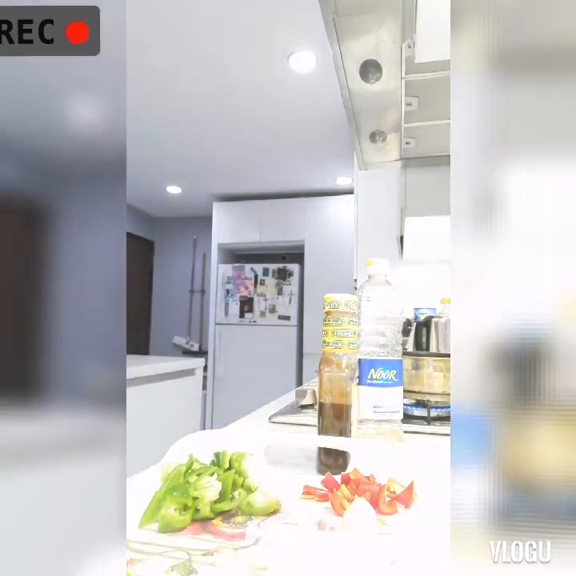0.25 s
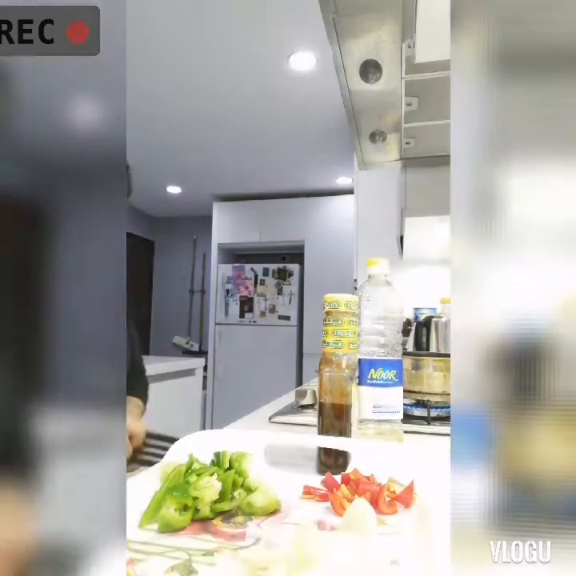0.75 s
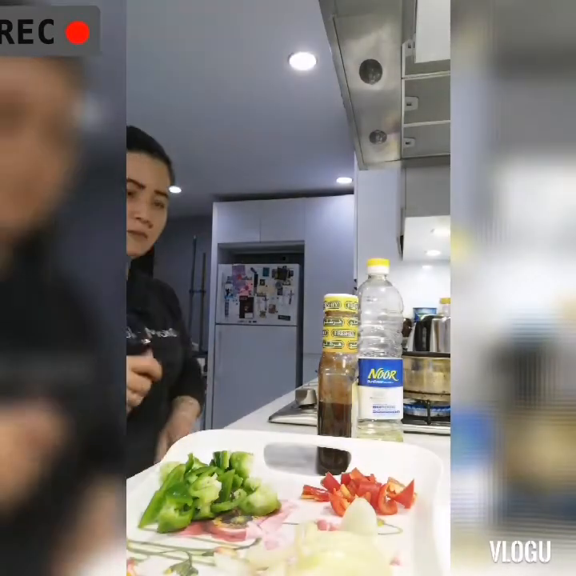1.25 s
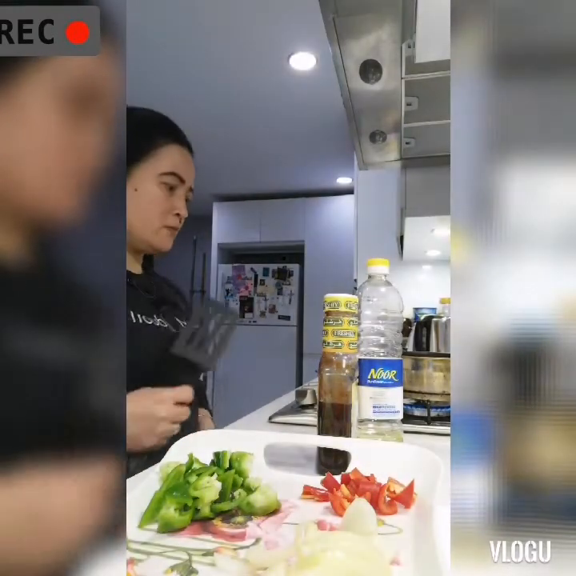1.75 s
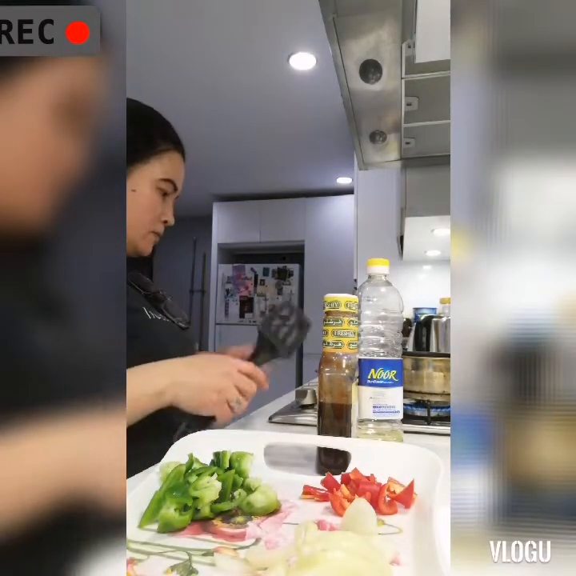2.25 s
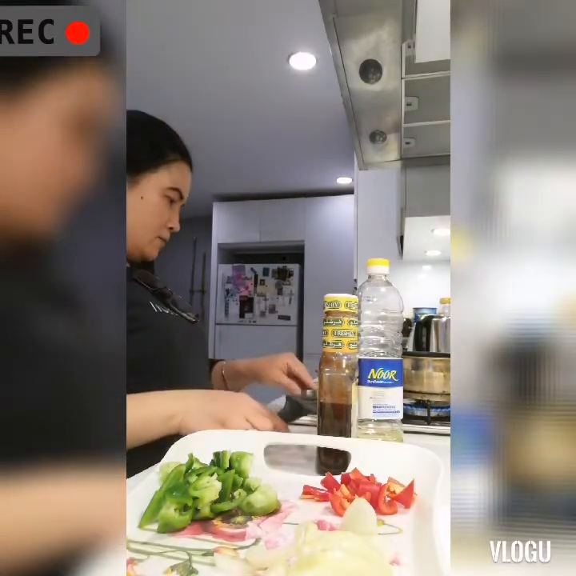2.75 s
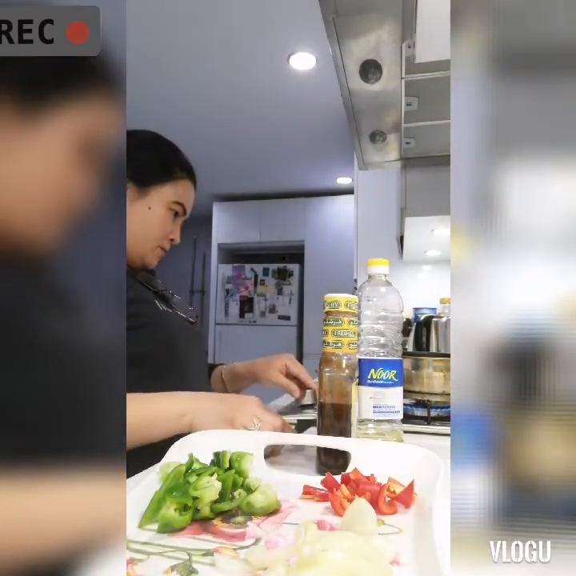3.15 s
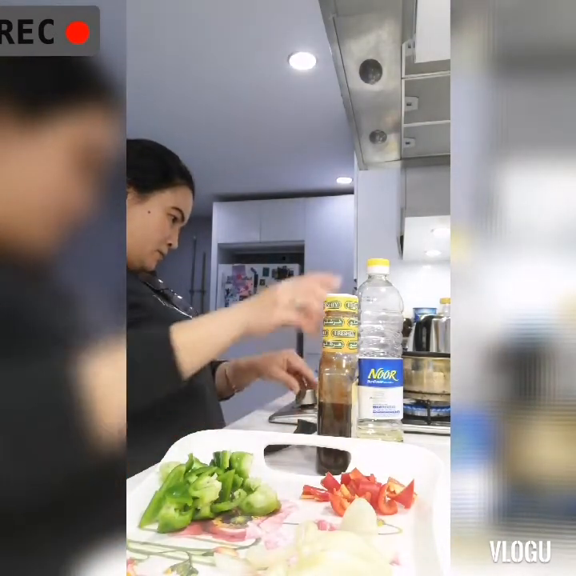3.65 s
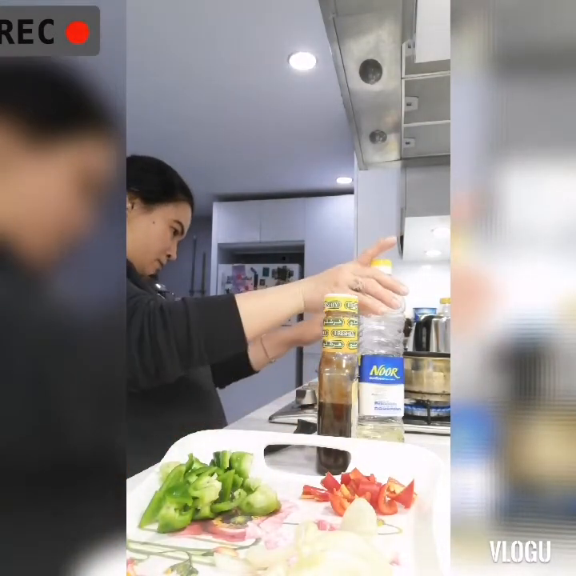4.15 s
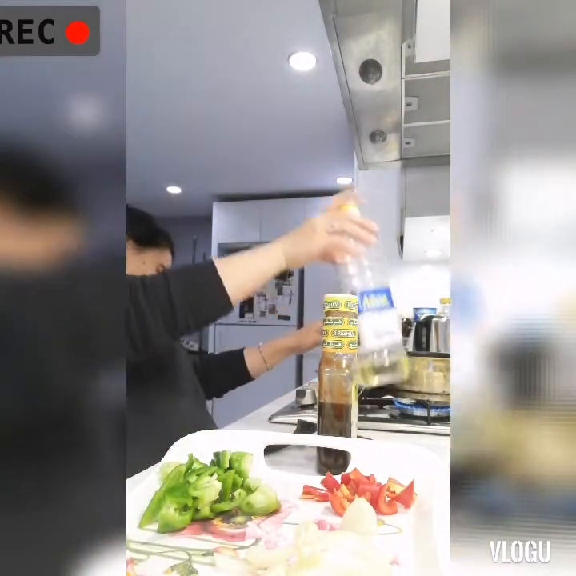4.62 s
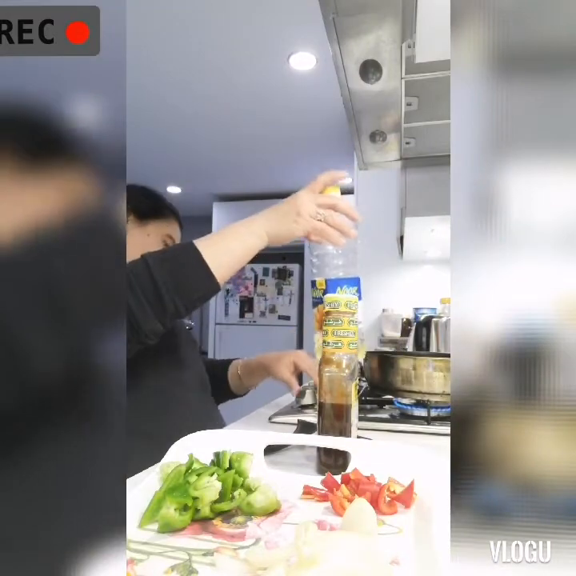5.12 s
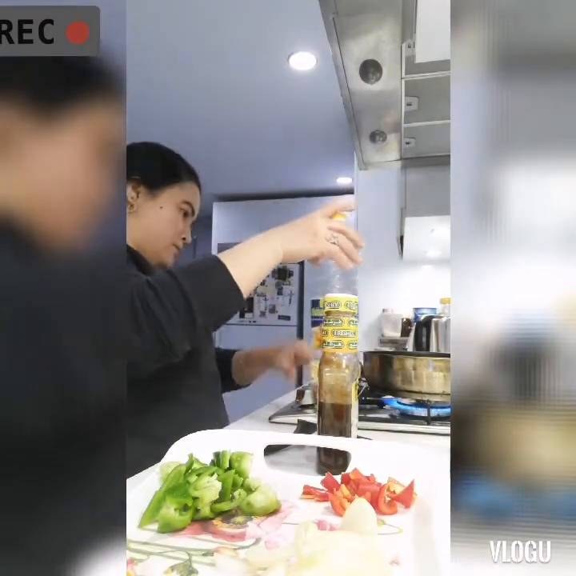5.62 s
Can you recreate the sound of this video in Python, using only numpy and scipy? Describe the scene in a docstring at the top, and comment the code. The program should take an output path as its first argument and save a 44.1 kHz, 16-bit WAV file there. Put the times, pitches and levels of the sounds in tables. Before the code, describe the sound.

A quiet, hard-walled kitchen with low appliance hum and faint hiss. Soft rustling and dragging lead to a loud drawer slam with jangling cutlery, then dull thumps and cloth brushing. A spatula taps, a steel spoon bounces down, and a stove knob snaps sharply. A plastic bottle creaks and clicks before burner gas whistles at the end. Close mono microphone, lively short echoes.

```python
"""A cutlery drawer slides, clatters and bumps shut in a hard-walled kitchen: noise through cabinet resonances,
with bursts and ringing modes for the blows. At the stove a spatula and a steel spoon are put down and a knob
snaps; a plastic bottle creaks in the hand. Gas starts to whistle in the burner, noise through its cavities.
A low appliance hum and a faint hiss lie under it all; filtered noise echoes give the blows their room."""
import sys
import numpy as np
from scipy import signal
from scipy.fft import rfft, irfft
from scipy.io import wavfile
from scipy.ndimage import uniform_filter1d

SR = 44100
rng = np.random.default_rng(int(sys.argv[2]) if len(sys.argv) > 2 else 0)


def store_pcm(level_fs):
    """Save levels as 16-bit WAV."""
    pcm = np.round(np.clip(level_fs, -1, 1) * 32767).astype(np.int16)
    wavfile.write(sys.argv[1], SR, np.atleast_2d(pcm).T)


N = 259308   # length in samples

# Airy crack of steel on steel. Each row: pitch in Hz, level in dB, t60 in seconds.
STEEL_CRACK = [(6500, -20, 0.05), (13500, -16, 0.12)]
BURST_RISE_S = 0.0014   # onset of the hard knocks and of the knob


def from_db(db):
    """Decibels to gain."""
    return 10 ** (np.asarray(db) / 20)


def rms_one(x):
    """Scale to rms 1."""
    return x / np.sqrt(np.mean(x ** 2) + 1e-20)


def at_hz(points, hz):
    """Read a curve of (Hz, value) points on a log-frequency axis."""
    points = np.array(points)
    return np.interp(np.log(hz + 1), np.log(points[:, 0]), points[:, 1])


def coloured(spectrum):
    """Noise with the given spectrum, rms 1."""
    hz = np.fft.rfftfreq(N, 1 / SR)
    white = rfft(rng.standard_normal(N))
    return rms_one(irfft(white * from_db(at_hz(spectrum, hz)), N))


def flicker(rate, depth_db):
    """A gain that wanders about rate times a second."""
    knots = rng.standard_normal(1000)
    return from_db(depth_db * np.interp(np.arange(N) * rate / SR, np.arange(1000), knots))


def resonance(x, hz, width_hz):
    """Two-pole resonance, gain 1 on top."""
    r = np.exp(-np.pi * width_hz / SR)
    feedback = [1, -2 * r * np.cos(2 * np.pi * hz / SR), r * r]
    return signal.lfilter([(1 - r * r) / 2, 0, (r * r - 1) / 2], feedback, x)


def resonant_noise(peaks):
    """Noise twice through each resonance, the second three times as wide, each at its own rms level."""
    out = np.zeros(N)
    for hz, width_hz, db in peaks:
        narrow = resonance(rng.standard_normal(N), hz, width_hz)
        out += from_db(db) * rms_one(resonance(narrow, hz, 3 * width_hz))
    return out


def fade(t60, rise_s, size=8192):
    """Quick rise and exponential fall."""
    t = np.arange(size) / SR
    return from_db(-60 * t / t60) * (1 - np.exp(-t / rise_s))


def swell(start_s, rise_s):
    """Smooth step from 0 to 1."""
    x = np.clip((np.arange(N) / SR - start_s) / rise_s, 0, 1)
    return x * x * (3 - 2 * x)


def strokes(rows, release_s, upper_fades):
    """Two gains from strokes that rise, change steadily in dB and let go."""
    t, out = np.arange(N) / SR, np.zeros((2, N))
    for s, length, first_db, second_db, fade_db_per_s, attack_s in rows:
        shape = swell(s - attack_s / 2, attack_s) * (1 - swell(s + length, release_s))
        lost_db = fade_db_per_s * np.clip(t - s, 0, length + release_s)
        out += shape * from_db([first_db - lost_db, second_db - upper_fades * lost_db])
    return out


def add(out, s, x):
    """Mix a short sound in at time s."""
    i = round(s * SR)
    out[i:i + len(x)] += x[:N - i]


def shaped(noise, envelope):
    """Noise under an envelope, carrying just the envelope's energy."""
    return rms_one(noise * envelope) * np.sqrt(np.mean(envelope ** 2))


def even_burst(envelope):
    """Micro-impacts under an envelope, spread so that no pitch stands out."""
    x = rng.standard_normal(len(envelope)) * envelope
    for _ in range(3):
        # level the spectrum, then restore the envelope in time
        spectrum = rfft(x)
        x = irfft(spectrum / (np.abs(spectrum) + 1e-12), len(x))
        x = envelope * x / np.sqrt(uniform_filter1d(x ** 2, size=160) + 1e-20)
    return x


def struck(blows, modes, share_db, loose_hz, rise_s=0.00058):
    """Every blow rings every mode; loose contact makes each ring waver within loose_hz."""
    out = np.zeros(N)
    for s, db in blows:
        for hz, level_db, t60 in modes:
            noise = rng.standard_normal(36864)
            ring = resonance(resonance(noise, hz, loose_hz), hz, 2 * loose_hz)[4096:]   # skip the build-up
            ring = shaped(ring, fade(t60, rise_s, size=32768))
            add(out, s, from_db(db + level_db + share_db) * ring)
    return out


def background():
    """Faint broadband hiss, and an appliance drone as narrow resonant noise."""
    # Hiss of the still kitchen. Each row: frequency in Hz, relative level in dB.
    floor = [(12, -39), (20, 0), (86, -8), (116, -9), (138, -20.5), (228, -14), (319, -29), (347, -22),
             (607, -29), (949, -29), (2200, -37), (2390, -31.5), (10800, -46), (14700, -44), (16000, -48)]
    # Appliance drone. Each row: pitch in Hz, width of its narrower resonance in Hz, rms level in dB.
    hum = [(119.4, 4.46, -69.5)]
    return from_db(-61) * coloured(floor) + resonant_noise(hum)


def gas():
    """The tap opens: the jet excites the burner's cavities and roars below."""
    # Burner cavities. Each row: pitch in Hz, width of the narrower resonance in Hz, relative level in dB.
    burner = [(1000, 200, -9), (1370, 100, 0), (1550, 150, -7), (2390, 300, -22), (4520, 150, -23),
              (6450, 170, -27), (8760, 150, -30), (9970, 120, -29), (11300, 90, -22)]
    # Plain jet noise. Each row: frequency in Hz, relative level in dB.
    jet_colour = [(300, -10), (900, 13), (1700, 2), (2500, -34.5), (6000, -58.5), (11000, -2), (15000, -23)]
    gas_on_s = 5.605
    whistle = from_db(-54.5) * swell(gas_on_s, rise_s=0.14)
    roar = from_db(-51.5) * swell(gas_on_s, rise_s=0.23)
    jet = rms_one(resonant_noise(burner)) + from_db(-11.5) * coloured(jet_colour)
    low = rms_one(resonant_noise([(133, 45, 0.81), (215.0, 23.5, -1.7)]))
    return whistle * jet + roar * flicker(30, 3.8) * low


def rustle():
    """Cloth and hands brushing: fine friction noise in two colours."""
    # Each row: start in seconds, length in seconds, bright hiss in dB, duller swish in dB,
    # fade of the hiss in dB per second, attack in seconds.
    brushes = [(0.0, 0.47, -53.5, -55.5, 170, 0.026), (.62, 0.08, -65, -53.5, 36, 0.033),
               (1.26, 0.32, -67, -64.5, 50, .04), (1.55, 0.079, -62, -64, 24, 0.065),
               (1.645, 0.33, -57.5, -54, 24, 0.015), (1.79, 0.13, -52.5, -65, 68, 0.27),
               (2.3, 0.16, -70, -70, 6, 0.17), (2.5, 0.18, -66, -64, 68.5, 0.057),
               (4.21, 0.043, -71, -94, 11, 0.012), (4.3, 0.1, -63, -83, 123, 0.036),
               (4.43, 0.15, -81, -92, -4, 0.032)]
    # Bright hiss. Each row: frequency in Hz, relative level in dB.
    hiss_colour = [(4000, -14.5), (6000, -13), (8000, -14.5), (9500, -16.5), (11000, -19), (14000, -30.5),
                   (16000, -20.5)]
    # Duller swish. Each row: frequency in Hz, relative level in dB.
    swish_colour = [(500, -25.5), (1200, -7.5), (2400, 18), (4800, 3), (7000, -18.5), (10000, -20)]
    gains = strokes(brushes, release_s=0.081, upper_fades=0.49)
    hiss, swish = gains * flicker(66, 0.81) * flicker(14, 3.0)
    return hiss * coloured(hiss_colour) + swish * coloured(swish_colour)


def ticks():
    """Tiny noise bursts: a pitch of their own, the bottle's plastic wall, a thin click."""
    # Small bright ticks and creaks. Each row: start in seconds, level in dB before a trim, pitch in Hz.
    creaks = [(2.709, -60, 9560), (4.068, -62, 6860), (4.267, -57, 4760), (4.301, -55, 5030),
              (4.3112, -47.5, 9100), (4.335, -56, 5600), (4.434, -56, 4850), (4.4606, -54, 6660),
              (4.46, -52.5, 4970), (4.4603, -48, 2770), (4.4789, -57, 6960), (5.022, -57, 6200),
              (3.249, -63, 4480)]
    # The bottle cap clicks. Each row: start in seconds, level in dB.
    cap_clicks = [(5.042, -34), (5.0495, -50)]
    # Modes of the cap. Each row: pitch in Hz, level in dB, t60 in seconds.
    cap = [(1160, -19, 0.022), (2540, -11.5, 0.027), (4400, -9, 0.019), (5000, -2, 0.018),
           (6100, -2, 0.013), (8840, -15, 0.0099)]
    out = np.zeros(N)
    for s, db, hz in creaks:
        noise = rng.standard_normal(8192)
        own = resonance(noise, hz, 0.045 * hz)
        wall = 0.14 * resonance(noise, 3100, 345)
        click = 0.051 * resonance(noise, 6600, 6000)
        tick = shaped(own + wall + click, fade(t60=0.055, rise_s=0.00075))
        add(out, s, from_db(db - 5.5) * tick)
    return out + struck(cap_clicks, cap, share_db=-0.5, loose_hz=320, rise_s=0.0017)


def bumps():
    """A soft blow sets a panel mode and a weaker, slightly off upper one swinging."""
    # Dull bumps through the counter. Each row: start in seconds, level in dB, pitch in Hz, t60 in seconds.
    thuds = [(.569, -37, 577, 0.12), (0.57, -45.5, 1117, 0.096), (0.787, -27.5, 197, 0.067),
             (1.247, -22, 117, 0.063), (1.397, -34.5, 172, 0.35), (1.57, -14.5, 115.5, 0.083),
             (1.597, -19.5, 103, 0.095), (1.875, -30, 84, 0.15), (1.908, -33.5, 206, 0.25),
             (2.002, -22, 204.6, 0.11), (2.087, -29.5, 67, 0.16), (2.232, -26, 179, 0.022),
             (3.245, -32.5, 417, 0.047), (3.399, -53.5, 385, 0.16), (3.551, -29, 171, 0.17),
             (4.116, -41, 102, 0.25), (4.128, -49, 311, 0.074), (4.217, -43, 1253, 0.016),
             (4.236, -40, 196, 0.11), (4.24, -38.5, 386, 0.092), (4.462, -43.5, 223, 0.12),
             (4.653, -42.5, 380, 0.1)]
    out, t = np.zeros(N), np.arange(8192) / SR
    for s, db, hz, t60 in thuds:
        swing = np.sin(2 * np.pi * hz * t) + 0.25 * np.sin(2 * np.pi * 1.3 * hz * t)
        add(out, s, from_db(db) * swing * fade(t60, rise_s=0.0034))
    return out


def knob():
    """Each snap is a very short burst through the broad resonances of knob and stove front."""
    # The knob snaps past its catch. Each row: start in seconds, peak in dB.
    snaps = [(3.548, -10.5), (3.567, -19)]
    # Knob and stove front. Each row: pitch in Hz, width in Hz, relative level in dB.
    front = [(1365, 280, -3), (2120, 260, -0.5), (2470, 292, 2), (3300, 410, -8), (5000, 600, -11),
             (8610, 600, -11.5)]
    out = np.zeros(N)
    for s, db in snaps:
        impacts = even_burst(fade(0.035, BURST_RISE_S))
        ring = np.zeros(len(impacts))
        for k, (hz, width_hz, level_db) in enumerate(front):
            ring += (-1) ** k * from_db(level_db) * resonance(impacts, hz, width_hz)   # alternating sign
        add(out, s, from_db(db) * ring / np.abs(ring).max())
    return out


def spatula():
    """The spatula rings against the drawer edge, then its head lands on the hob and the hob rings."""
    # Blows on the drawer edge. Each row: start in seconds, level in dB.
    edge_blows = [(2.0015, -38.5)]
    # Modes of the spatula. Each row: pitch in Hz, level in dB, t60 in seconds.
    blade = [(2010, -1, 0.5), (2250, 11, .04), (4330, -13, 0.65), (7180, -14, 0.45)]
    # The head lands on the hob. Each row: start in seconds, level in dB.
    set_down = [(3.248, -37)]
    # Modes of the hob. Each row: pitch in Hz, level in dB, t60 in seconds.
    hob = [(455, -4.5, 0.59), (659, -5, 0.059), (1115, -14.5, 0.2), (1980, -4, 0.032)]
    ring = struck(edge_blows, blade, share_db=-2.5, loose_hz=680)
    return ring + struck(set_down, hob, share_db=0.0, loose_hz=129.7)


def spoon():
    """A steel spoon bounces: each landing rings its modes under an airy crack."""
    # Landings. Each row: start in seconds, level in dB.
    bounces = [(3.398, -24.5), (3.4455, -30.5), (3.474, -33), (3.492, -36)]
    # Modes of the spoon. Each row: pitch in Hz, level in dB, t60 in seconds.
    modes = [(2410, 1, 0.043), (4000, -16, 0.042), (4740, -11, 0.098), (8720, -9, 0.03), (9690, -16, 0.05)]
    ring = struck(bounces, modes, share_db=-1.5, loose_hz=169.7)
    return ring + struck(bounces, STEEL_CRACK, share_db=-4.5, loose_hz=6000)


def knocks():
    """A burst of micro-impacts heard through the body, a bright crack and a boomy panel."""
    # Hard knocks. Each row: start in seconds, level in dB before a trim, body pitch in Hz,
    # treble in dB relative to the body, bass in dB relative to the body, burst t60 in seconds.
    hits = [(0.621, -43, 1990, -16, 12.5, 0.066), (0.713, -11, 990, -8.5, -4, 0.099),
            (.771, -5, 2500, -9, -11, 0.11), (0.809, -8.5, 2520, -21, -11.5, 0.067),
            (1.545, -42, 2490, -5, 13.5, 0.06), (1.562, -30, 1140, -25, -1.5, 0.42),
            (1.641, -26.5, 3300, 2, -24, 0.023), (2.002, -35, 1340, -11.5, -1.5, 0.54),
            (2.489, -49.5, 1120, -15, 2.5, 0.34), (3.398, -23, 3230, 2, 5, 0.078),
            (3.548, -12, 1500, -6, -0.5, 0.074), (3.59, -19.5, 1240, -23, 1, 0.038),
            (4.651, -46, 2006, -17, -8.5, 0.033)]
    out = np.zeros(N)
    bright = signal.butter(3, [4000, 10500], "band", fs=SR, output="sos")
    dull = signal.butter(3, 3600, fs=SR, output="sos")
    for s, db, hz, treble_db, bass_db, t60 in hits:
        sharp, soft = fade(t60, BURST_RISE_S), fade(1.3 * t60, 0.00076)
        impacts = even_burst(sharp)
        body = rms_one(signal.sosfilt(dull, resonance(resonance(impacts, hz, 2400), hz, 2400)))
        crack = rms_one(signal.sosfilt(bright, impacts) + 0.041 * impacts)
        boom = rms_one(resonance(resonance(even_burst(soft), 450, 450), 450, 450))
        burst = body + from_db(treble_db) * crack + from_db(bass_db) * boom
        add(out, s, from_db(db - 13) * burst * np.sqrt(np.mean(sharp ** 2)))
    return out


def cutlery():
    """Blows shake the cutlery: many long steel modes ring under an airy crack."""
    # Blows. Each row: start in seconds, level in dB before a trim.
    rattles = [(0.715, -13), (0.771, -3.5)]
    # Modes of the cutlery. Each row: pitch in Hz, level in dB, t60 in seconds.
    modes = [(544, 10, 0.4), (845, 2, 0.6), (1050, 4, 0.35), (1170, 5, 0.35), (1346, 0, .55),
             (2200, -3, .65), (2540, 0, 0.6), (2790, -1, 0.6), (3240, -1, 0.65), (4231, -4, 0.5),
             (4990, -4, 0.5)]
    ring = struck(rattles, modes, share_db=-33.5, loose_hz=100)
    return ring + struck(rattles, STEEL_CRACK, share_db=-17.5, loose_hz=5980)


def drawer():
    """Dragging rumbles in the cabinet's low resonances and scrapes unevenly above them."""
    # Drawer and things dragged over the counter. Each row: start in seconds, length in seconds,
    # rumble in dB, scrape in dB, fade of the rumble in dB per second.
    drags = [(0.0, 0.44, -57.5, -62.5, 16), (0.576, 0.12, -56, -44, -10), (0.94, 0.32, -51.5, -59.5, -8),
             (1.261, 0.38, -44.5, -55, 14.5), (1.621, 0.06, -42, -53, 199), (1.872, 0.11, -45.5, -55.5, 44),
             (2.001, 0.16, -42, -46.5, 59), (2.227, 0.085, -43, -70, 302), (3.251, 0.1, -47.5, -61, 33),
             (3.398, 0.22, -38, -40.5, 118.5), (4.09, 0.148, -57.5, -68.5, -3),
             (4.25, 0.124, -51, -71, 102), (4.476, 0.19, -59, -64, 131), (4.65, 0.15, -61, -68, 109)]
    # Cabinet. Each row: pitch in Hz, width of the narrower resonance in Hz, relative level in dB.
    runners = [(46, 54, -8), (107.8, 15, 1.5), (169.5, 41, 1.5), (208, 14, -14), (353.6, 13, -9.5)]
    # Scraping noise. Each row: frequency in Hz, relative level in dB.
    scrape_colour = [(160, -23.5), (395, 7.5), (452, 3.5), (1080, -8), (1220, -7.5), (2420, -39),
                     (4000, -58), (8800, -120)]
    attack_s = 0.0046   # each drag starts with a jolt
    rows = [(*row, attack_s) for row in drags]
    # the scrape fades 1.4 times faster than the rumble
    rumble, scrape = strokes(rows, release_s=0.029, upper_fades=1.4) * flicker(30, 2)
    low = rumble * rms_one(resonant_noise(runners))
    return low + scrape * flicker(140, 2.4) * coloured(scrape_colour)


def room(x):
    """Dense echoes off hard walls: noise in half-octave bands, each dying at its own rate."""
    # Each row: frequency in Hz, t60 in seconds.
    room_t60 = [(100, 0.54), (260, 0.7), (700, 0.66), (1800, 0.86), (3000, 1), (5000, 0.8), (6500, 0.68),
                (8500, 0.44), (11000, 0.54), (15000, 0.21)]
    first_echo_s, knee_s, drop_db_per_s = 0.0025, 0.26, 53.5
    t, tail = np.arange(SR) / SR, np.zeros(SR)
    edges = 60 * 2 ** np.arange(0, 8.5, 0.5)
    for low, high in zip(edges, edges[1:]):
        half_octave = signal.butter(2, [low, high], "band", fs=SR, output="sos")
        band = signal.sosfilt(half_octave, rng.standard_normal(SR))
        tail += band * from_db(-60 * t / at_hz(room_t60, np.sqrt(low * high)))
    tail *= np.clip(t / first_echo_s - 1, 0, 1)
    tail *= from_db(-drop_db_per_s * np.maximum(t - knee_s, 0))   # late echoes fall away faster
    return signal.fftconvolve(x, tail / np.sqrt(np.sum(tail ** 2)))[:N]


def gain_control(x):
    """The recorder turns loud passages down within milliseconds and the gain creeps back."""
    attack_s, knee_db, release_db_per_s = 0.014, -35.5, 122
    squeeze = 0.17   # dB turned down per dB above the knee
    keep = np.exp(-1 / (attack_s * SR))
    level_db = 10 * np.log10(signal.lfilter([1 - keep], [1, -keep], x ** 2) + 1e-12)
    # a running maximum on a rising ramp: the held level falls at the release rate
    ramp = release_db_per_s * np.arange(N) / SR
    held_db = np.maximum.accumulate(level_db + ramp, axis=-1) - ramp
    return x * from_db(-squeeze * np.maximum(held_db - knee_db, 0))


def scene():
    """Blows ring on in the room; the steady sounds already carry it."""
    steady = background() + gas() + rustle() + drawer()
    steel = spatula() + spoon() + cutlery()
    hard, near, low = knocks() + knob(), ticks(), bumps()
    sent = hard + from_db(-10.5) * steel + from_db(-2.0) * low
    sent = sent + from_db(-8.5) * near   # things close to the microphone sound drier
    blows = hard + steel + near + low + from_db(-7) * room(sent)
    blows = signal.sosfilt(signal.butter(2, 50, "high", fs=SR, output="sos"), blows)
    return (blows + steady)[None]


def record(dry):
    """The microphone's housing adds peaks and dips; gain control follows; the top is cut."""
    # Housing. Each row: frequency in Hz, width in Hz, gain in dB.
    housing = [(2260, 2600, -5), (3670, 300, -11), (5157, 580, 1), (7850, 400, -3), (8710, 670, 4),
               (9650, 430, 5)]
    for hz, width_hz, db in housing:
        dry = dry + (from_db(db) - 1) * resonance(dry, hz, width_hz)
    top_cut = signal.cheby2(12, 60, 16300, fs=SR, output="sos")   # 60 dB down from 16300 Hz
    return signal.sosfilt(top_cut, gain_control(dry))


dry = scene()
out = record(dry)
store_pcm(out)
```